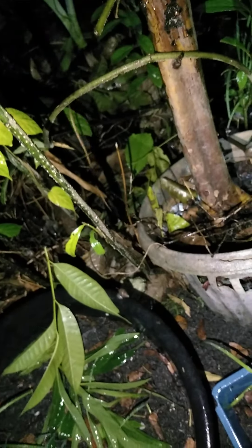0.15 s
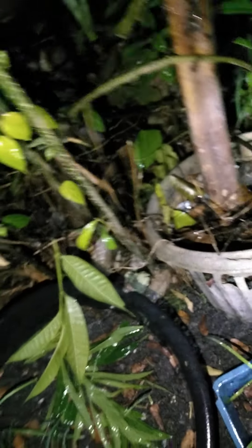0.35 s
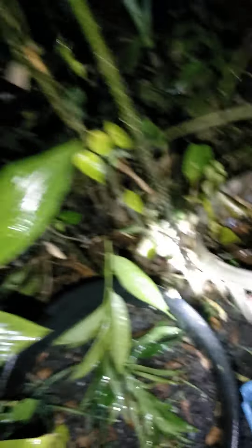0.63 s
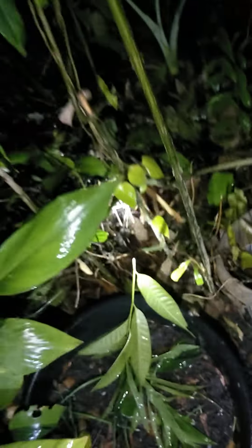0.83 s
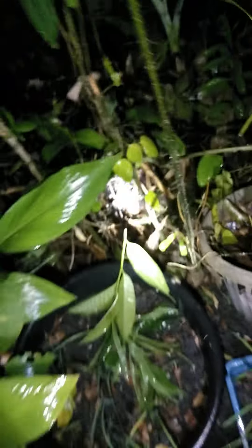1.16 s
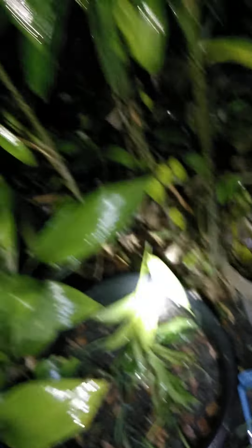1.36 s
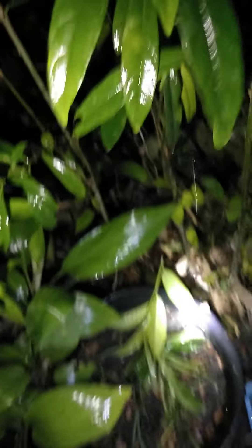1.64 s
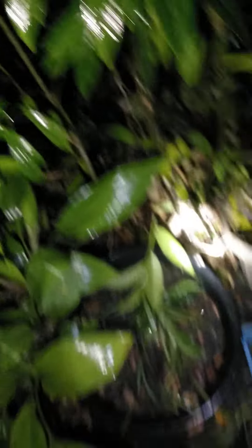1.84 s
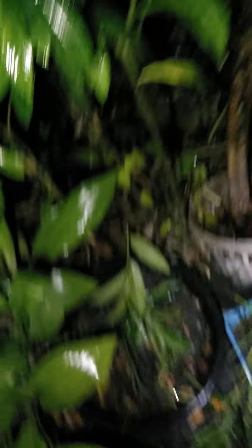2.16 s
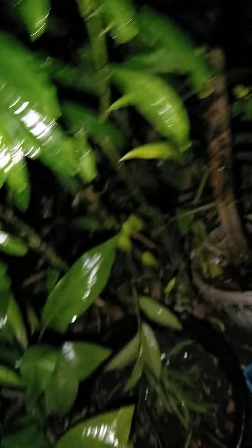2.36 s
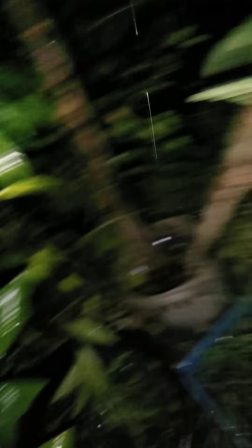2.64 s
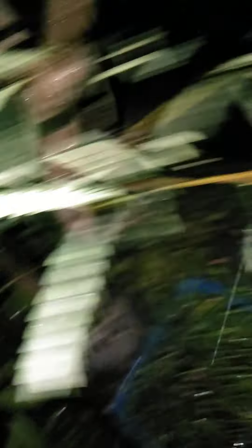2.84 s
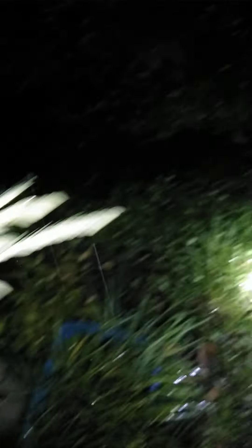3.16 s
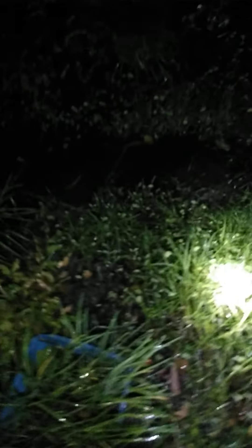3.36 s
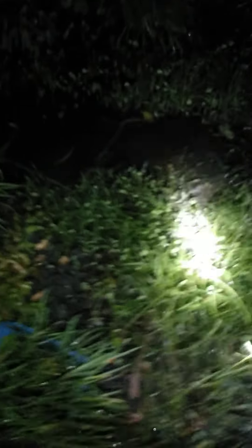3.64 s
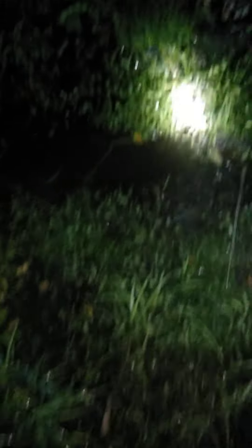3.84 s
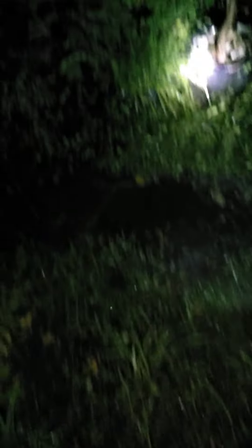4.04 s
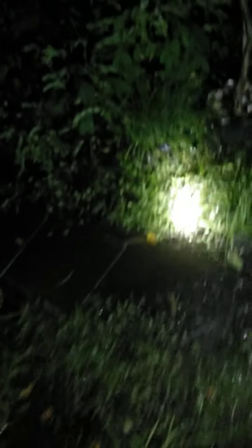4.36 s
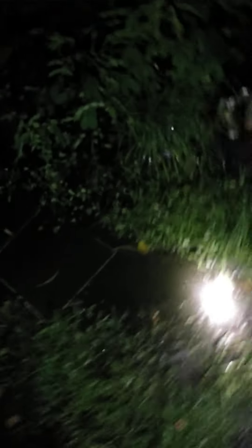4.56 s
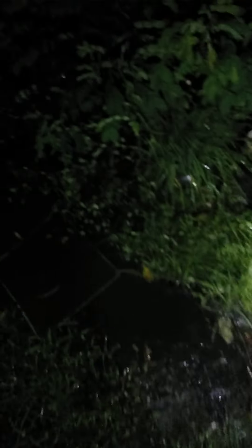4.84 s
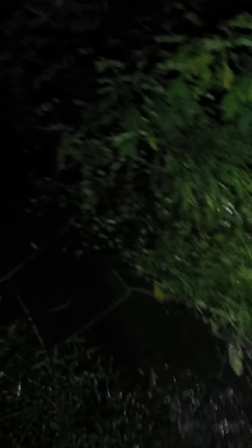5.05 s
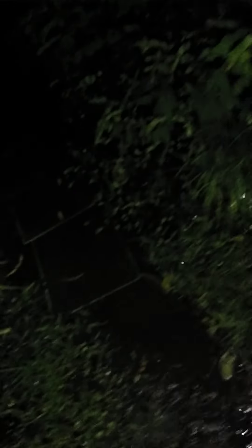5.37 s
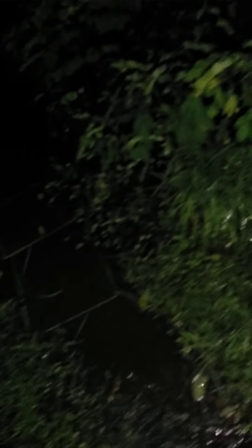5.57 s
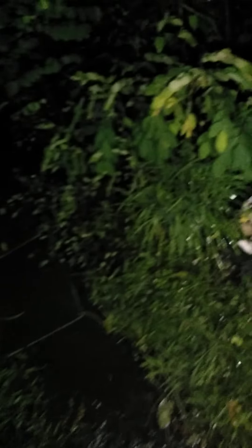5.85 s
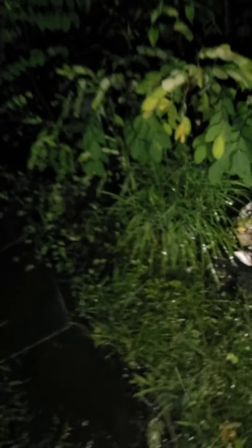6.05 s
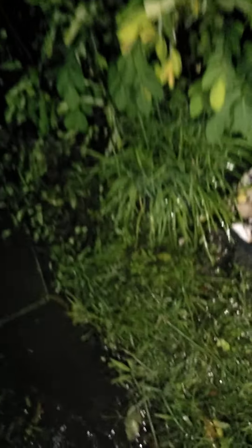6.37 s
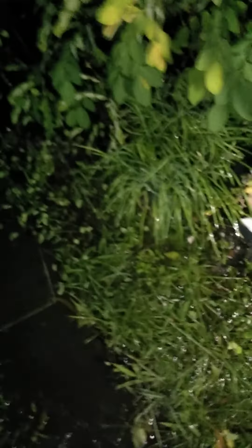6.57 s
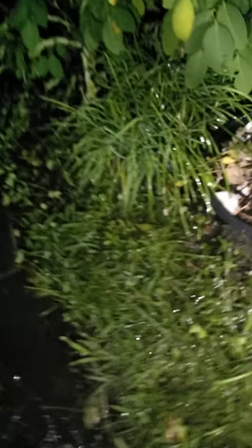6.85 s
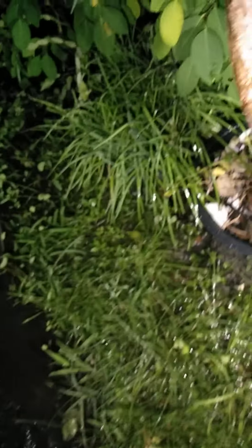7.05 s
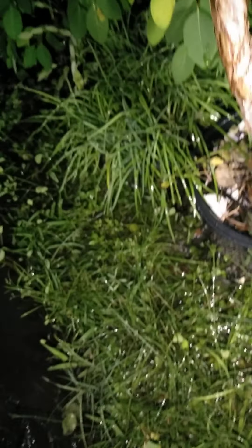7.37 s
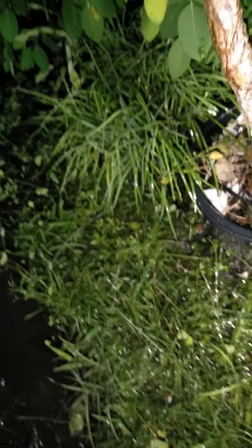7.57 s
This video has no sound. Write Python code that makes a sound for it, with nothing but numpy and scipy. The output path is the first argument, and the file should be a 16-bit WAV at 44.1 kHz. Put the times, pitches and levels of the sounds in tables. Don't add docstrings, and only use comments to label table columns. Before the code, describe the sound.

A mole cricket trills without pause in a damp night garden, a narrow buzzing tone around 2.2 kHz pulsing about 120 times a second. It is strongest and brightest at first, with a sweeping hollow coloration from roughly 0.7 to 1.9 seconds. A small tick falls at 0.7, then a sole scrapes grit from about 1.6 to 2.1, loudest near 1.8. Sparse twig ticks follow. The trill wavers around 4 seconds, then drops markedly by 5.4, dull and fluttering among leaf echoes, with very brief dips near 6.9 and 7.5. Ticks, woody knocks and a soft thud cluster around 4.4, another knock near 5.2, and a crisp snapping cluster at 6.55. Faint footfalls touch soft soil, two near the end. Fine high cricket chirps, faint air and distant traffic stay far beneath, picked up by a moving handheld phone.

```python
import sys
import numpy as np
from scipy import signal
from scipy.fft import rfft, irfft
from scipy.io import wavfile
from scipy.ndimage import uniform_filter1d, map_coordinates

SR = 44100
rng = np.random.default_rng(int(sys.argv[2]) if len(sys.argv) > 2 else 0)


def generate_wav(sig):
    pcm = np.round(np.clip(np.atleast_2d(sig).T, -1, 1) * 32767).astype(np.int16)
    wavfile.write(sys.argv[1], SR, pcm)


def how_loud(loudness_db):
    steps = np.asarray(loudness_db, float) / 20
    return 10 ** steps


N = 340452
TIME = np.arange(N) / SR

# time in seconds, strokes per second in Hz.
STROKE_RATE = [(0, 121.7), (.8, 121.2), (3.77, 121.0), (4.0, 118.3), (4.88, 118.8), (5.0, 120.0),
               (6.2, 120.6), (7.72, 120.9)]
# time in seconds, level in dB.
TRILL_LEVEL = [(0, -35), (1.0, -38), (1.25, -35.5), (1.9, -38), (2.35, -38.5), (3.25, -40), (3.62, -42.5),
               (3.95, -39), (4.35, -41.5), (4.9, -47), (5.4, -50), (5.8, -46.5), (6.19, -46), (6.35, -50.5),
               (6.55, -46.5), (6.78, -47), (6.9, -56.5), (7.25, -48.5)]
# time in seconds, depth in dB, length in seconds.
SHADES = [(2.15, -4, 0.12), (4.224, -2.5, 0.037), (4.705, -2.5, 0.035), (5.16, -2.5, 0.051),
          (6.68, -3, 0.019), (6.859, -15, .011), (6, -6.5, 0.017), (6.946, -7, 0.01), (0.61, -0.5, 0.086),
          (7.17, -2, .025), (7.407, 0, .03), (6.6, -1.5, 0.018), (5.08, -2, 0.024), (5.37, 0, 0.037),
          (7.493, -11, 0.0066)]
# time in seconds, level in dB.
MOUTH_VIEW = [(0, 3.5), (1.0, -2), (1.25, -1), (1.45, -5.5), (2.1, -3), (2.7, -1), (3.2, -6.5),
              (3.68, -2.5), (3.8, -10), (4.7, -21), (7.72, -22)]
# time in seconds, extra path in ms, strength 0-1.
NEAR_SURFACE = [(0, 2.38, .1), (.5, 2.23, .15), (.72, 2.14, .45), (.97, 2.035, .9), (1.09, 1.9, .9),
                (1.21, 1.79, .7), (1.38, 1.67, .75), (1.53, 1.565, .85), (1.72, 1.43, .75), (1.9, 1.38, .4),
                (2.3, 1.36, .2), (7.72, 1.36, .2)]
LEAF_PATHS_MS = [5.9, 14.3, 27.1, 43.7, 66.2, 95.5]
# time in seconds, level in dB.
LEAF_ECHO = [(0, -14), (.8, -18), (1.7, -18), (2.2, -13), (4.3, -10), (5.1, -5), (5.8, -11), (6.2, -10),
             (6.6, -5), (7.72, -5)]
# centre in Hz, width in Hz.
SIDE_MODES = [(1935, 80), (1790, 240)]
# time in seconds, first mode in dB, second mode in dB.
SIDE_LEVEL = [(0, -31, -28), (.6, -20, -22.5), (1.1, -26, -29), (2, -37, -43), (4.5, -17.5, -30),
              (5.2, -23.5, -44), (7.72, -17.5, -40)]
# time in seconds, level in dB.
LOW_SINGER = [(0, -71), (1.3, -64.5), (2.5, -64.5), (3.5, -65.5), (4.1, -70), (4.8, -66), (6.2, -64.5),
              (7.72, -66.5)]
# time in seconds, level in dB.
HIGH_SINGER = [(0, -66), (.5, -62), (1.0, -68), (2.2, -69), (3.0, -72), (4.5, -74), (7.72, -75)]
# centre in Hz, width in Hz, level in dB.
CHORUS = [(2163, 470, -62), (7030, 470, -70.5), (8710, 1700, -73), (10700, 1400, -79.5), (3360, 1400, -90)]
# time in seconds, level in dB, thud against grit in dB.
SCUFF = [
    (1.55, -80, 13),
    (1.572, -74, -5),
    (1.58, -69, -6),
    (1.634, -54.5, -4.5),
    (1.692, -50, -1),
    (1.766, -48, -7.5),
    (1.778, -50, -0.5),
    (1.936, -56, 0),
    (2.2, -76.5, 1),
]
# frequency in Hz, density in dB per Hz.
SCUFF_COLOUR = [(600, -59), (1500, -20), (2600, -11.5), (3650, -11), (4650, -13.5), (6200, -15),
                (10000, -26), (15300, -33)]
# time in seconds, delay in ms.
SCUFF_ECHO = [(1.55, .9), (1.68, .94), (1.8, .98), (1.88, 1.0), (2.0, .94), (2.2, .94)]
# time in seconds, peak in dB, pitch in Hz, length in ms.
TICKS = [(.7, -43.5, 5430, 11), (.7, -54, 11000, 4), (1.349, -46, 5960, 2.9), (2.422, -50, 5100, 6.8),
         (2.95, -48, 5000, 3), (3.193, -53, 11000, 4), (3.308, -49, 5500, 2.7), (3.6, -51, 5500, 4.2),
         (3.924, -51, 10100, 8), (4.444, -46, 6000, 3), (4.444, -55, 12500, 3), (4.464, -47, 10500, 5),
         (4.49, -46, 6100, 5.7), (4.502, -43, 3160, 6.7), (4.543, -49, 11500, 4), (4.747, -47, 10000, 3),
         (5.165, -48, 3800, 3.5), (5.22, -43, 4230, 8.2), (5.576, -47, 6260, 2.6), (5.9, -46, 4640, 4.5),
         (5.91, -44.5, 8440, 4.1), (5.946, -48, 4500, 2.5), (5.997, -47, 4150, 2.8),
         (6.539, -39, 6240, 3.7), (6.546, -40, 6200, 7), (6.55, -39, 6530, 4), (6.555, -37.5, 6600, 4),
         (6.562, -48, 7500, 4), (6.65, -52, 5000, 3), (6.685, -48, 5500, 3.9)]
# time in seconds, peak in dB, pitch in Hz, length in ms.
KNOCKS = [(3.195, -46, 1250, 6), (4.49, -48, 1500, 12), (5.2, -38.5, 1670, 8.9), (5.212, -47, 1450, 14),
          (4.465, -44, 2920, 12), (5.29, -47.5, 900, 30), (6.546, -46, 1630, 18), (6.55, -40.5, 3700, 10)]
# time in seconds, peak in dB, pitch in Hz, length in ms.
THUDS = [(4.34, -43.5, 202, 20), (5.125, -49.5, 180, 23), (5.268, -51.5, 107, 27), (5.319, -47.5, 174, 17),
         (5.975, -52.5, 89, 89), (7.533, -52.5, 132, 39), (7.579, -55, 102, 21)]
# frequency in Hz, density in dB per Hz.
AIR_COLOUR = [(25, -73), (45, -45), (62, -39), (90, -24), (130, -30), (200, -28), (340, -29), (1000, -29),
              (1500, -34), (2600, -32.5), (4000, -36.5), (6200, -41), (10000, -50), (15400, -54)]
# time in seconds, air in dB, traffic in dB.
AIR_LEVEL = [(0, -60, -66.5), (1.3, -61.5, -67), (2.9, -61, -69.5), (4.0, -62, -73.5), (7.47, -63.5, -71.5),
             (7.72, -62.5, -76)]
# time in seconds, level in dB.
DRONE = [(0, -82), (1.2, -66.5), (2.3, -62.5), (4, -68), (6, -64.5), (6.5, -67.5), (7.72, -74)]
# frequency in Hz, level in dB.
HUM = [(102.3, -82.5)]

HARP_HZ, HARP_FALL_HZ, BURROW_WIDTH_HZ = 2279.8, 102, 360
STROKE_MS, STROKE_SCATTER_MS = 5.09, 0.078
OCTAVE_DB, RASP_DB = -63, -63
SWING_S, SWING_LENGTH_S, SWING_HZ = 4.3, 0.6, 1.1
LOW_FIRST_S, LOW_PERIOD_S = 0.05, 0.1077
HIGH_FIRST_S, HIGH_PERIOD_S = 0.069, 0.1345


def curves(table):
    s, *columns = np.transpose(table)
    return [np.interp(TIME, s, c) for c in columns]


def unit(x):
    return x / np.sqrt(np.mean(x ** 2))


def noise():
    return rng.standard_normal(N)


def band(x, hz, width_hz):
    return signal.lfilter(*signal.iirpeak(hz, hz / width_hz, fs=SR), x)


def band_twice(x, hz, width_hz):
    return band(band(x, hz, width_hz), hz, width_hz)


def coloured(x, points):
    hz, db = np.transpose(points)
    f = np.fft.rfftfreq(N, 1 / SR) + 1
    gain = how_loud(np.interp(np.log(f), np.log(hz), db))
    return unit(irfft(rfft(x) * gain, N))


def walk(rate_hz):
    k = int(SR / rate_hz)
    held = np.repeat(rng.standard_normal(N // k + 1), k)
    return unit(uniform_filter1d(uniform_filter1d(held, k), k)[:N])


def delayed(x, ms):
    return map_coordinates(x, [np.arange(N) - ms * SR / 1000], order=3)


def strokes(rate_hz, scatter_ms, size_db, length_ms, hz, fall_hz):
    count = np.cumsum(rate_hz * np.ones(N)) / SR
    beats = np.arange(int(count[-1]) + 2)
    lateness, size = rng.standard_normal((2, len(beats)))
    starts_s = np.interp(beats, count, TIME)
    starts_s = starts_s + np.cumsum(lateness * scatter_ms) / 1000
    k = np.clip(np.searchsorted(starts_s, TIME) - 1, 0, None)
    since_s = np.maximum(TIME - starts_s[k], 0)
    along = np.clip(since_s * 1000 / length_ms, 0, 1)
    envelope = how_loud(size_db * size)[k] * np.sin(np.pi * along ** 0.69)
    return envelope, 2 * np.pi * since_s * (hz - fall_hz * along / 2)


def garden_paths(horn):
    echo = how_loud(curves(LEAF_ECHO)[0])
    direct = unit(signal.sosfilt(signal.butter(8, 2470, fs=SR, output="sos"), horn))
    leaves = sum(delayed(direct, ms + 0.1 * walk(1.514)) for ms in LEAF_PATHS_MS)
    paths = direct + echo * unit(leaves)
    paths *= how_loud(2.8 * echo * walk(70))
    return paths / np.sqrt(uniform_filter1d(paths ** 2, size=1456))


def mole_cricket():
    swing = np.exp(-((TIME - SWING_S) / SWING_LENGTH_S) ** 4)
    rate_hz = curves(STROKE_RATE)[0] + SWING_HZ * swing * walk(14)
    envelope, phase = strokes(rate_hz, STROKE_SCATTER_MS, 0.18, STROKE_MS, HARP_HZ, HARP_FALL_HZ)
    file_tone = envelope ** 2.0 * np.sin(phase)
    horn = band(band(file_tone, HARP_HZ - 60, BURROW_WIDTH_HZ), HARP_HZ - 60, 420)

    edges = envelope ** 0.18 * np.sin(phase)
    side = 0
    for (hz, width_hz), db in zip(SIDE_MODES, curves(SIDE_LEVEL)):
        side = side + how_loud(db) * unit(band(band_twice(edges, hz, width_hz), hz, width_hz))
    rasp = unit(signal.sosfilt(signal.butter(4, [2750, 3900], "band", fs=SR, output="sos"), edges))
    octave = unit(band(envelope * np.sin(2 * phase), 3710, 700))

    extra_ms, strength = curves(NEAR_SURFACE)
    paths = garden_paths(horn)
    paths = paths + np.clip(strength, 0, 1) * delayed(paths, extra_ms)
    octave = octave + 0.98 * strength * delayed(octave, extra_ms)
    rasp = rasp + 0.98 * strength * delayed(rasp, extra_ms)

    level_db, = curves(TRILL_LEVEL)
    for s, depth_db, length_s in SHADES:
        level_db = level_db + depth_db * np.exp(-((TIME - s) / length_s) ** 4)
    view_db, = curves(MOUTH_VIEW)
    return how_loud(level_db) * (paths + side) + how_loud(OCTAVE_DB + view_db) * octave + how_loud(RASP_DB + view_db) * rasp


def chirps(first_s, period_s, length_s, level_db, scatter_db, song):
    k = np.round((TIME - first_s) / period_s).astype(int)
    strength, shift = rng.standard_normal((100, 2))[k].T
    off_s = abs(TIME - first_s - k * period_s - 0.0044 * shift)
    opening = np.clip(1.63 * (1 - 2 * off_s / length_s), 0, 1)
    return how_loud(level_db + scatter_db * strength) * opening * unit(song)


def small_crickets():
    envelope, phase = strokes(118, 0.04, 2.0, 5.2, 9020, 400)
    clean = envelope ** 2 * np.sin(phase)
    high = chirps(HIGH_FIRST_S, HIGH_PERIOD_S, 0.125, curves(HIGH_SINGER)[0], 1.1, clean)
    rough = band_twice(noise(), 7050, 520) * how_loud(2.0 * walk(120))
    low = chirps(LOW_FIRST_S, LOW_PERIOD_S, 0.055, curves(LOW_SINGER)[0], 1.6, rough)
    far = 0
    for hz, width_hz, db in CHORUS:
        far = far + how_loud(db + 1.6 * walk(6.5)) * unit(band_twice(noise(), hz, width_hz))
    return how_loud(-1.0) * high + how_loud(-0.9) * low + far


def scuff():
    level_db, thud_db = curves(SCUFF)
    on = (TIME > SCUFF[0][0]) & (TIME < SCUFF[-1][0])
    grit = coloured(noise() * how_loud(0.27 * walk(400)), SCUFF_COLOUR)
    grit = grit - 0.45 * delayed(grit, curves(SCUFF_ECHO)[0])
    ring = np.exp(-((TIME - 1.79) / 0.078) ** 2) * band(grit, 4700, 250)
    ring = ring + 0.53 * np.exp(-((TIME - 1.75) / 0.12) ** 2) * band(grit, 3700, 190)
    thud = unit(band(noise(), 98, 57) + 0.6 * band(noise(), 450, 400))
    return on * how_loud(level_db) * (how_loud(4.0) * (grit + 2.3 * ring) + how_loud(thud_db) * thud)


def bursts(table, spread, noisy):
    out = np.zeros(N + SR)
    t = np.arange(SR // 8) / SR
    for s, db, hz, ms in table:
        tone = np.sin(2 * np.pi * hz * t * (0.404 + np.exp(-t * 1500 / ms)))
        source = noisy * rng.standard_normal(len(t)) + (1 - noisy) * tone
        envelope = np.exp(-t * 2000 / ms) * np.minimum(t * 8000 / ms, 1)
        burst = band_twice(source * envelope, hz, spread * hz)
        start = int(s * SR)
        out[start:start + len(t)] += how_loud(db) * burst / np.max(abs(burst))
    return out[:N]


def twigs_and_steps():
    ticks = bursts(TICKS, spread=0.77, noisy=0.72)
    knocks = bursts(KNOCKS, spread=0.5, noisy=1.0)
    return ticks + knocks + bursts(THUDS, spread=2.3, noisy=0.49)


def night_air():
    flicker = 0
    for hz in 45 * 2. ** np.arange(9):
        flicker = flicker + how_loud(1.2 * walk(4.4)) * band(noise(), hz, 0.49 * hz) / np.sqrt(hz)
    spectrum = rfft(flicker)
    flat = irfft(spectrum / np.sqrt(uniform_filter1d(abs(spectrum) ** 2, size=400)), N)
    air = coloured(flat, AIR_COLOUR)
    traffic = signal.sosfiltfilt(signal.butter(2, 150, fs=SR, output="sos"), air)
    drone = how_loud(curves(DRONE)[0]) * unit(band_twice(noise(), 336, 190))
    hum = sum(how_loud(db) * np.sqrt(2) * np.sin(2 * np.pi * hz * TIME + 0.37 * walk(1.9)) for hz, db in HUM)
    air_db, traffic_db = curves(AIR_LEVEL)
    return how_loud(air_db + 3.0) * (air - traffic) + how_loud(traffic_db - 0.6) * unit(traffic) + drone + hum


def scene():
    return (mole_cricket() + small_crickets() + scuff() + twigs_and_steps() + night_air())[None]


def roll_off(x):
    return signal.sosfilt(signal.butter(12, 15410, fs=SR, output="sos"), x)


def record(dry):
    mix = signal.sosfilt(signal.butter(4, 60, "high", fs=SR, output="sos"), dry)
    return roll_off(mix)


dry = scene()
out = record(dry)
generate_wav(out)
```